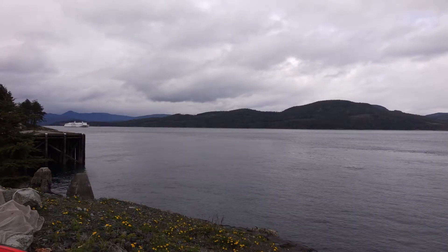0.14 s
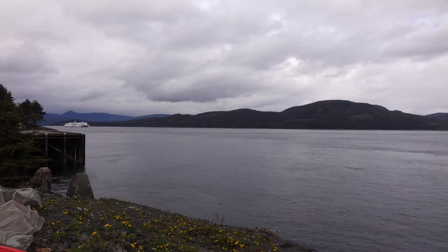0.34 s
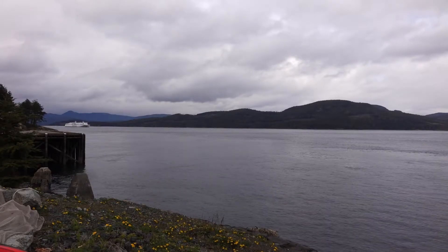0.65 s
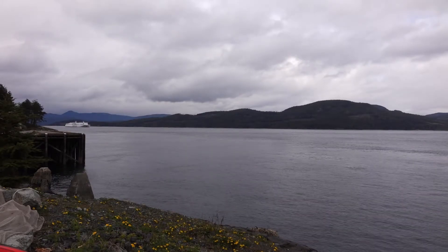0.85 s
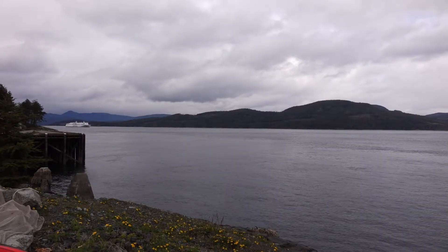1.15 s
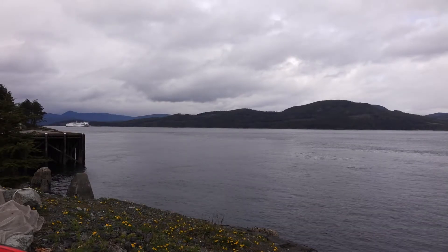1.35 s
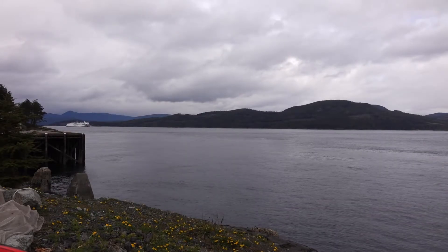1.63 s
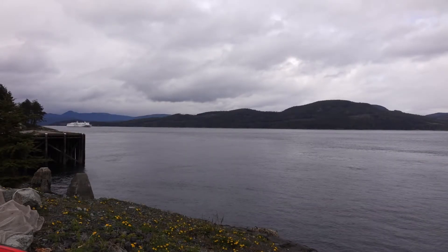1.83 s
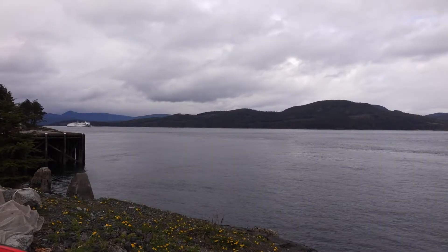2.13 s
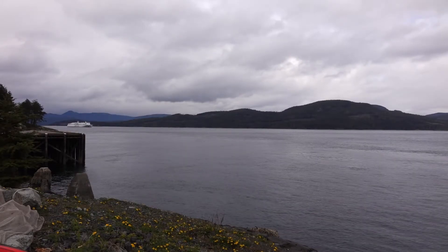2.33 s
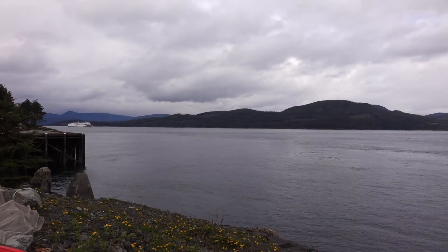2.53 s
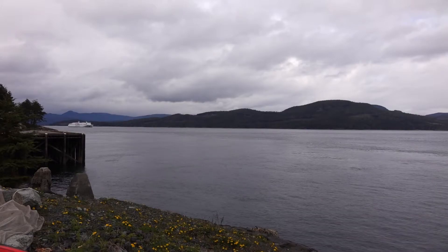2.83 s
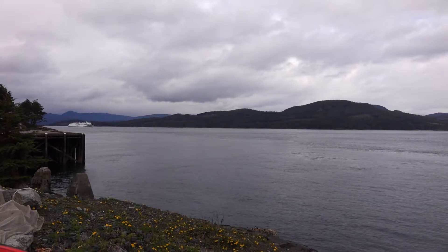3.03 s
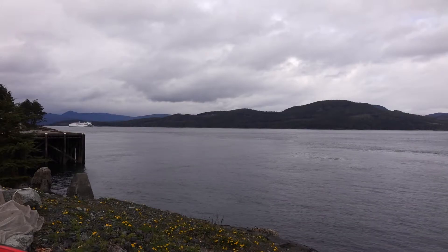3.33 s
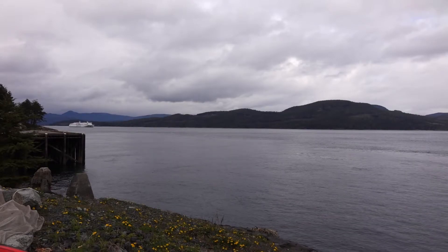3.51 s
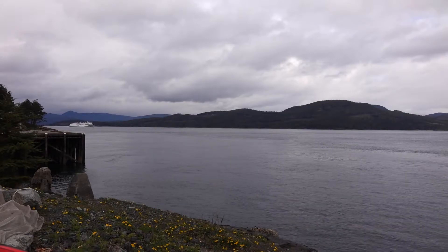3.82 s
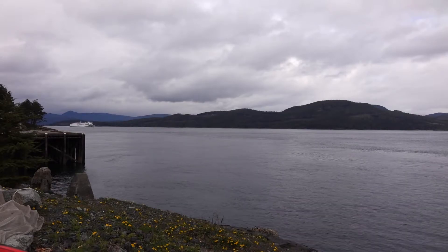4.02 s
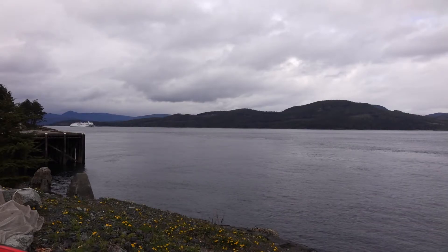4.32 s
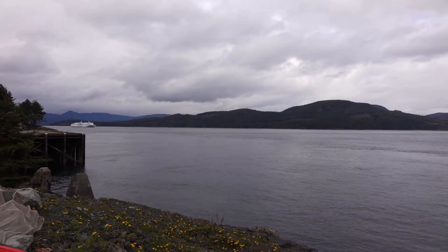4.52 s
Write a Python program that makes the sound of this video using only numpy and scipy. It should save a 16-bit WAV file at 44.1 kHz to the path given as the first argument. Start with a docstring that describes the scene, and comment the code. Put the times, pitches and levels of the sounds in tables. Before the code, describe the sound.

Outdoor stereo recording beside wide water: one long, deep ship's horn blast, a reedy minor-sounding chord softened by distance, fills nearly the whole stretch with an airy rush around it. A short splashy wash over gravel comes first and fizzes out. Low wind rumbles intermittently on the microphone, calmest around one second and strongest after three and a half. The horn stops together in the last instant, leaving a faint tail.

```python
"""Distant ferry horns from a gravel shore

A ferry holds a chord across open water: three stacks of partials that creep up in pitch, swell and fade
on the long path, and shut off together at the end, with a rush of noise for their air.
Wind buffets the microphone as low noise driven by gusts, and a wavelet washes up the gravel and drains
away as three bands of noise: wash, spray and foam. A steady hiss of ripples lies underneath."""
import sys
import numpy as np
from scipy import signal
from scipy.fft import rfft, irfft
from scipy.io import wavfile
from scipy.ndimage import uniform_filter1d

SR = 44100
rng = np.random.default_rng(int(sys.argv[2]) if len(sys.argv) > 2 else 0)


def master(y):
    """Save y as 16-bit WAV."""
    cut = np.clip(np.atleast_2d(y).T, -1, 1)
    pcm = np.round(cut * 32767)  # scale
    wavfile.write(sys.argv[1], SR, pcm.astype(np.int16))


N = 205682
T = np.arange(N) / SR
HOP = 128  # samples between the frames of shaped noise
WINDOW = 8 * HOP
BINS = np.fft.rfftfreq(WINDOW, 1 / SR)
FRAMES = np.arange(N // HOP + 2) * HOP / SR

# Leading partials of each horn, each swelling slowly as the paths over the water shift:
# (multiple of the pitch, level [dB], swell [+-dB], time of a crest [s], swell period [s])
LOW_LEADING = [(2, -33, 1.4, 1.83, 3.7), (3, -31, 3, -0.12, 5.3), (4, -32, 3, 3, 6.9),
               (5, -43, 0.3, 1.5, 3.4), (6, -48.5, 4, 1.9, 3.5)]
MIDDLE_LEADING = [(2, -34.5, 2.7, 2.95, 4.2), (3, -29, 2.85, 3.9, 5.44), (4, -39, 3.2, 2.3, 7),
                  (5, -51, 6.5, 2.24, 6.9), (7, -54, 4.8, 1.45, 3.05)]
HIGH_LEADING = [(2, -36.5, 4, 4.01, 4.15), (3, -35.5, 3, 3.1, 3.05), (4, -45, 3.6, 4.06, 7.6),
                (5, -54.5, 4.2, 3.19, 4.3), (6, -56.5, 6.6, 2.35, 2.2)]
# Weaker partials of each horn: (multiple of the pitch, level before the horn's trim [dB])
LOW_WEAK_PARTIALS = [(1, -52.5), (7, -56), (8, -53), (9, -56.5), (10, -63.5), (11, -63.5), (12, -67),
                     (13, -62), (14, -68.5), (15, -69)]
MIDDLE_WEAK_PARTIALS = [(1, -57), (6, -60.5), (8, -61.5), (9, -66), (10, -63), (11, -63.5), (12, -76)]
HIGH_WEAK_PARTIALS = [(1, -53.5), (7, -61), (8, -61), (9, -63), (10, -70.5)]
# Air supply at shut-off: (time [s], gain [dB])
AIR_VALVE = [(4.5, 0), (4.548, -2.5), (4.575, -12.5), (4.66, -13)]


def ferry():
    """Three horns and their rush of air share one valve; a faint tail lingers after it shuts."""
    low, middle, high = HORN_TUNING
    # weak_swell: (swell [+-dB], time of a crest [s], swell period [s])
    chord = horn(low, LOW_LEADING, LOW_WEAK_PARTIALS,
                 weak_swell=(4, 1.42, 3.7), weak_trim_db=-1.4, fade_db=0.6)
    chord += horn(middle, MIDDLE_LEADING, MIDDLE_WEAK_PARTIALS,
                  weak_swell=(5, 1.44, 5.1), weak_trim_db=-3.0, fade_db=0.54)
    chord += horn(high, HIGH_LEADING, HIGH_WEAK_PARTIALS,
                  weak_swell=(0.65, 2, 2.3), weak_trim_db=-1.9, fade_db=1.52)
    valve_db = curves(AIR_VALVE)[0]
    return (chord + air_rush()) * amp(valve_db)


# Each horn creeps up to its pitch as it blows:
# (settled pitch [Hz], starts flat by [Hz], settling time [s])
HORN_TUNING = [(167.25, 1.485, .463), (205.54, 2.549, 2.64), (240.84, 5.6, 2.04)]
FULL_SWELL_HZ = 1300  # lower weak partials swell less, in proportion
SHARED_AIR = 0.022  # depth to which each other horn's pulses shake this one through the common air line


def horn(tuning, leading, weak, weak_swell, weak_trim_db, fade_db):
    """A diaphragm chops the air at one pitch; the flare passes partials 2 to 5 best."""
    turns = cycles(tuning)
    pitch_hz = turns[-1] / T[-1]
    out = np.zeros((2, N))
    for multiple, level_db, *own_swell in leading:
        multiple = round(multiple)
        hz = multiple * pitch_hz
        scatter = hz / 700  # higher partials fade and wander more
        moving_db = level_db + swell(*own_swell) + nulls(hz)
        out += partial(multiple * turns, hz, moving_db, fade_db * scatter,
                       wander=0.097 * scatter, flutter=0.03)
    for multiple, level_db in weak:
        multiple = round(multiple)
        hz = multiple * pitch_hz
        scatter = hz / 1500  # turbulence disturbs short waves most
        swell_share = min(hz / FULL_SWELL_HZ, 1)
        moving_db = level_db + weak_trim_db + swell_share * swell(*weak_swell)
        out += partial(multiple * turns, hz, moving_db, fade_db=2.3,
                       wander=0.31 * scatter, flutter=0.17 * scatter)
    other_pulses = sum(np.cos(2 * np.pi * cycles(other)) for other in HORN_TUNING if other != tuning)
    return out * (1 + SHARED_AIR * other_pulses)


def cycles(tuning):
    """Cycles done by a horn whose pitch creeps up and settles."""
    settled_hz, flat_hz, settle_s = tuning
    pitch_hz = settled_hz - flat_hz * np.exp(-T / settle_s)
    return np.cumsum(pitch_hz) / SR


# Stereo lean of the horns: (frequency [Hz], left minus right [dB])
HORN_LEAN = [(330, 1.86), (500, 2.9), (615, 1), (700, 4.5), (820, 6), (1000, 4), (1200, 6.5), (1450, -3),
             (2500, 5.5)]


def partial(turns, hz, level_db, fade_db, wander, flutter):
    """One horn partial after the long path: air turbulence fades it, bends its phase and makes it flutter."""
    tone = amp(level_db + fade_db * drift(1.4)) * np.sqrt(2)
    tone = tone * (1 + flutter * (drift(14) + 1j * drift(14)))
    phase = 2 * np.pi * (turns + rng.random()) + wander * drift(0.74)
    tone = tone * np.exp(1j * phase)
    # reflections off the water reach the two ears slightly differently
    ear_phase = 0.055 + (0.01 + 0.7 * wander) * drift(1.4)
    side = amp(read(HORN_LEAN, hz) / 2) * np.exp(1j * ear_phase)
    return np.array([(tone * side).real, (tone / side).real])


def swell(depth_db, crest_s, period_s):
    """A slow rise and fall of level, in dB."""
    return depth_db * np.cos(2 * np.pi * (T - crest_s) / period_s)


# Fades where a reflection works against one partial: (frequency [Hz], time [s], depth [dB], length [s])
REFLECTION_NULLS = [(334, 0.67, 4, 0.19), (477, 2.2, 7.5, 0.44), (716, .42, 10, 0.23),
                    (716, 1.03, 3.5, 0.7), (817, 2.76, 7, 0.28), (835, 0.76, 8, .35), (955, 1.55, 14, 0.26),
                    (955, 3.15, 4.5, .4), (1003, 2.88, 12, 0.38), (1193, 1.25, 11.5, 0.86),
                    (1431, 0.42, 8, 1.4)]
NULL_REACH_HZ = 9  # a null catches a partial nearer than this


def nulls(hz):
    """The brief fades of the partial at hz as a reflection cancels part of it, in dB."""
    return -sum(depth_db * bump(time_s, length_s)
                for null_hz, time_s, depth_db, length_s in REFLECTION_NULLS
                if abs(hz - null_hz) < NULL_REACH_HZ)


# Colour of the rush of air: (frequency [Hz], relative density [dB per Hz])
RUSH_COLOUR = [(250, -26.5), (400, -9.5), (560, -0.5), (680, -1.5), (830, -3.5), (1000, -5.5),
               (1250, -11.5), (1600, -13), (2300, -19), (2800, -30.5), (5000, -50)]
# Likeness of left and right, for the rush, wavelet and water: (frequency [Hz], likeness [0-1])
LIKENESS = [(40, .85), (150, .2), (500, 0.4), (1500, 0.6), (2500, 0.45), (4000, 0.1), (6000, .05),
            (15000, 0.01)]


def air_rush():
    """Air hissing through the horns: steady noise, strongest in the middle of the range."""
    return amp(-44.0) * noise(read(RUSH_COLOUR, BINS), read(LIKENESS, BINS))


# Breeze on the microphone between the gusts, easing and then rising again, before the low cut:
# (time [s], level [dB])
BREEZE_LEVEL = [(0, -40.5), (.95, -53), (1.55, -50.5), (2.1, -47), (2.5, -48.5), (3.1, -44.5), (3.8, -44),
                (4.66, -43.5)]
# Gusts that buffet the microphone, before the low cut: (peak time [s], level [dB], length [s])
GUST_PEAKS = [(0.022, -28.5, 0.056), (0.186, -33, 0.031), (0.374, -36, .07), (0.491, -34.5, 0.032),
              (0.617, -37, .05), (1.42, -46.5, 0.076), (1.803, -40, 0.036), (1.974, -37.5, 0.041),
              (2.156, -34, .05), (2.264, -35.5, .04), (2.881, -38.5, .03), (2.96, -32, 0.088),
              (3.079, -37.5, 0.066), (3.347, -36, 0.05), (3.428, -39.5, .03), (3.544, -27.5, .04),
              (3.679, -23, 0.076), (3.785, -26.5, .07), (3.895, -30, .09), (4.055, -36.5, 0.047),
              (4.187, -33.5, 0.056), (4.282, -29, 0.029), (4.415, -29, 0.03), (4.52, -32.5, .03),
              (4.621, -22.5, .08)]
# Colour of the eddies before gusts tilt it: (frequency [Hz], relative density [dB per Hz])
EDDY_COLOUR = [(20, -31.5), (40, -23.5), (62, -16.5), (90, -5), (125, 5), (170, -1.5), (250, -3.5),
               (330, -13), (450, -20.5), (800, -32.5), (2000, -73), (5000, -100)]


def wind(lumpy_db=2.0, brighten=0.41, alike=0.79, low_cut_hz=55):
    """Eddies push on the microphone; the stronger the gust, the higher it reaches."""
    power = amp(curves(BREEZE_LEVEL)[0] + lumpy_db * drift(9.8)) ** 2
    for peak_s, peak_db, length_s in GUST_PEAKS:
        power += amp(peak_db) ** 2 * bump(peak_s, length_s)
    gust_db = np.interp(FRAMES, T, 10 * np.log10(power))
    gust_lift_db = (gust_db - gust_db.mean())[:, None]
    octaves = np.log2(np.clip(BINS, 95, 310) / 140)
    eddies = noise(read(EDDY_COLOUR, BINS) + brighten * gust_lift_db * octaves, alike)
    # level the eddies, so breeze and gusts alone set the strength of each buffet
    eddy_power = uniform_filter1d((eddies ** 2).mean(0), size=1800)
    buffets = eddies / np.sqrt(eddy_power + 1e-9) * np.sqrt(power)
    # the microphone sheds the deepest thumps
    low_cut = signal.butter(2, low_cut_hz, "high", fs=SR, output="sos")
    return signal.sosfilt(low_cut, buffets)


# The wavelet runs up the gravel, lingers and drains away: (time [s], flow [dB])
WAVELET_FLOW = [(.04, -16), (.17, -6), (.4, -0.5), (.55, -2), (.7, -10), (1.22, -9.5), (1.7, -20),
                (2.2, -41.5)]
# Splashes on top of the flow:
# (peak time [s], length [s], lift of the wash [dB], lift of the spray [dB], lift of the foam [dB])
SPLASHES = [(0.304, 0.061, 7, 4, 5), (0.348, .04, 3.5, 6, 2), (0.413, .04, 1.5, 3, -3),
            (0.491, 0.046, -1.5, 5.8, 4), (0.76, 0.19, 4.5, 2, 1), (1, .06, 1.5, 3, 1)]
# Colours of the three layers: (frequency [Hz], relative density [dB per Hz])
WASH_COLOUR = [(500, -15), (1200, 3), (2700, 0.5), (3800, -1.5), (5000, -3), (6200, -10.5), (9000, -25),
               (15000, -42)]
SPRAY_COLOUR = [(4000, -31), (5400, -4.5), (6400, 0), (8200, -3), (9500, -5.5), (12000, -16.5)]
FOAM_COLOUR = [(6000, -27), (8500, -5), (10500, -1), (13000, 2.5), (16000, -7.5)]


def wavelet(grain_db=1.0, patchy_db=1.65):
    """Water rushes over the stones and throws a little spray, then the foam fizzes out."""
    flow_db = curves(WAVELET_FLOW)[0]
    # (colour, level at 0 dB of flow [dB], response [dB per dB of flow])
    layers = [(WASH_COLOUR, -45, 0.94), (SPRAY_COLOUR, -47.5, 1.4), (FOAM_COLOUR, -51, 0.85)]
    out = np.zeros((2, N))
    for i, (colour, level_db, response) in enumerate(layers):
        splash_db = sum(lift_db[i] * bump(peak_s, length_s) for peak_s, length_s, *lift_db in SPLASHES)
        hiss = noise(read(colour, BINS) + patchy_db * patches(), read(LIKENESS, BINS) + 0.1)
        out += amp(level_db + response * flow_db + splash_db + grain_db * drift(90)) * hiss
    return out


def patches():
    """Random patches of rms 1, about 50 ms long and 1 kHz wide, that mottle the hiss."""
    field = rng.standard_normal((len(FRAMES), len(BINS)))
    long_patches = uniform_filter1d(field, size=16, axis=0)
    return unit(uniform_filter1d(long_patches, size=24, axis=1))


# Colour of the open water all around: (frequency [Hz], relative density [dB per Hz])
WATER_COLOUR = [(30, -10.5), (150, -10.5), (500, -2), (1000, -6.5), (2000, -18.5), (3000, -22), (4500, -25),
                (6500, -31.5), (10000, -33), (15500, -36)]


def water():
    """The steady wash of ripples far and near: noise whose level barely drifts."""
    level_db = -48.6 + 0.8 * drift(1.5)
    return amp(level_db) * noise(read(WATER_COLOUR, BINS), read(LIKENESS, BINS))


def noise(field_db, alike):
    """Stereo noise of rms 1 whose colour is field_db (bins, or frames x bins)."""
    a, b, c, d = rng.standard_normal((4, len(FRAMES), len(BINS)))
    same = np.clip(alike, 0, 1)
    left = a + 1j * b
    right = same * left + np.sqrt(1 - same ** 2) * (c + 1j * d)
    spectra = (np.array([left, right]) * amp(field_db)).transpose(0, 2, 1)
    return unit(signal.istft(spectra, nperseg=WINDOW, noverlap=WINDOW - HOP)[1][:, :N])


def drift(rate_hz, size=2048):
    """Smooth random motion of rms 1 whose spectrum rolls off above about rate_hz."""
    grid = np.linspace(0, N / SR, size)
    f = np.fft.rfftfreq(size, grid[1])
    rolloff = (f > 0) / (1 + (f / rate_hz) ** 2)
    slow = irfft(rfft(rng.standard_normal(size)) * rolloff)
    return np.interp(T, grid, unit(slow))


def bump(peak_s, length_s):
    """A smooth rise to 1 and back."""
    return np.exp(-(2 * (T - peak_s) / length_s) ** 2)


def curves(rows, t=T):
    """Each column of a table, joined by straight lines in time."""
    s, *columns = np.transpose(rows)
    return [np.interp(t, s, column) for column in columns]


def read(points, hz):
    """A spectrum, joined by straight lines on a log frequency axis."""
    f, value = np.transpose(points)
    return np.interp(np.log(hz + 1), np.log(f + 1), value)


def amp(db):
    """Decibels to gain."""
    return 10 ** (np.asarray(db) / 20)


def unit(x):
    """Scales to rms 1."""
    return x / np.sqrt(np.mean(x ** 2) + 1e-20)


def scene():
    """The ferry over the sounds of the shore."""
    return ferry() + wind() + wavelet() + water()


def record(dry):
    """Softens the two ends, then cuts everything above the recorder's band limit."""
    soft = dry * signal.windows.tukey(N, 0.003)
    edge_hz = 15750
    band_limit = signal.firwin(511, edge_hz, window=("kaiser", 9), fs=SR)
    return signal.oaconvolve(soft, band_limit[None], "same")


dry = scene()
out = record(dry)
master(out)
```